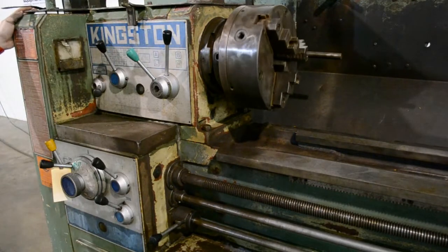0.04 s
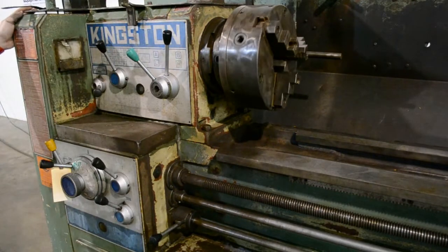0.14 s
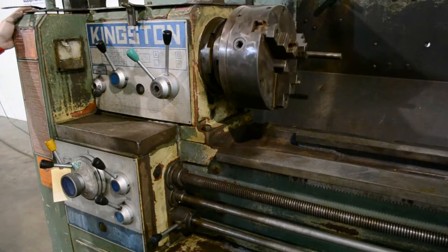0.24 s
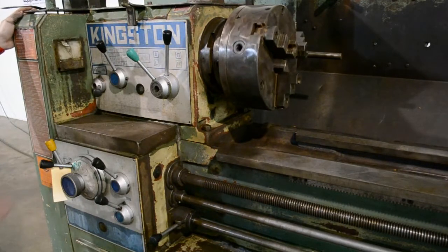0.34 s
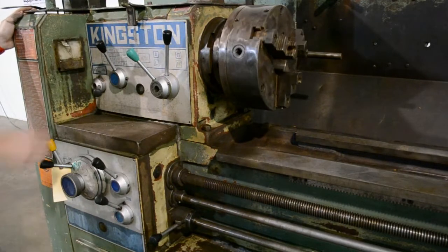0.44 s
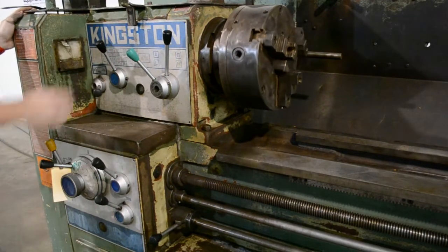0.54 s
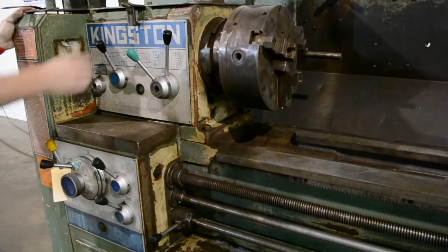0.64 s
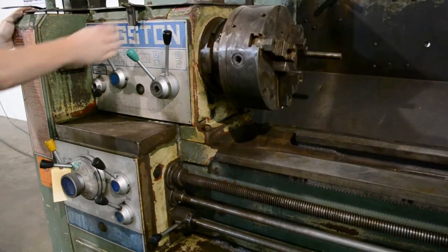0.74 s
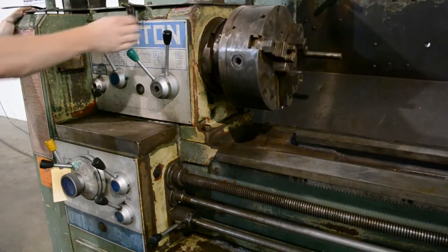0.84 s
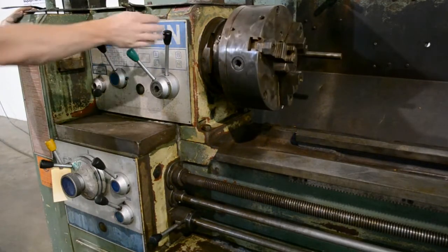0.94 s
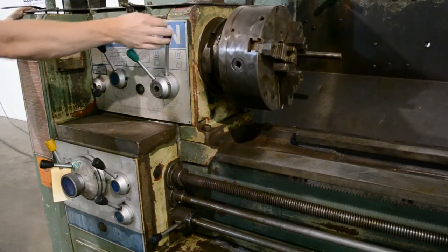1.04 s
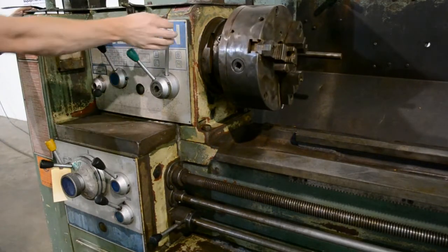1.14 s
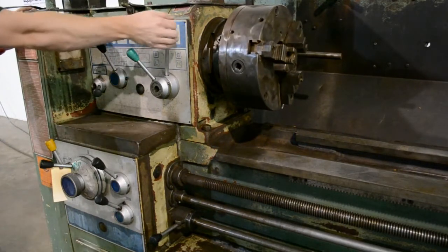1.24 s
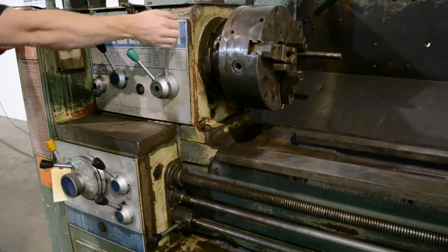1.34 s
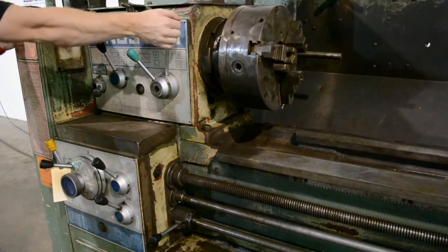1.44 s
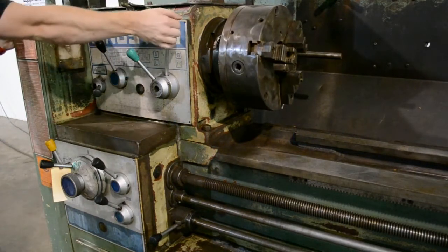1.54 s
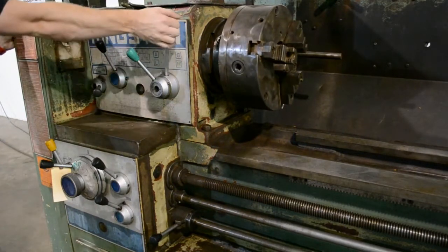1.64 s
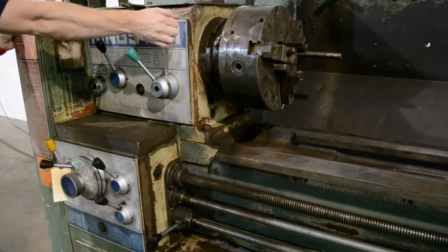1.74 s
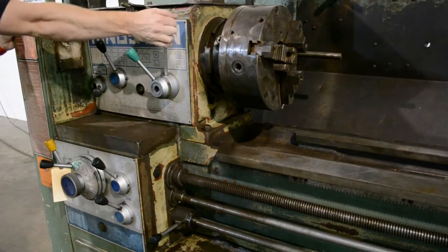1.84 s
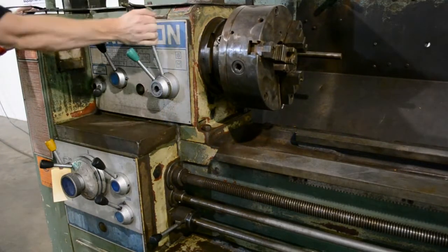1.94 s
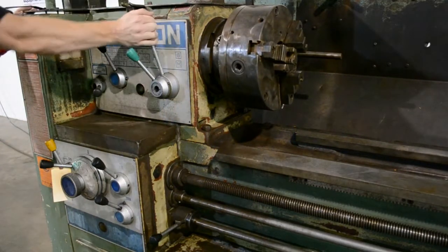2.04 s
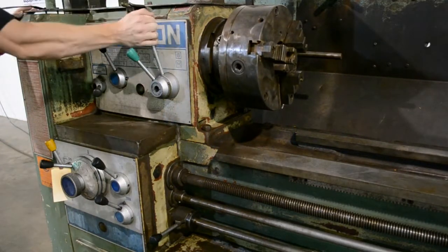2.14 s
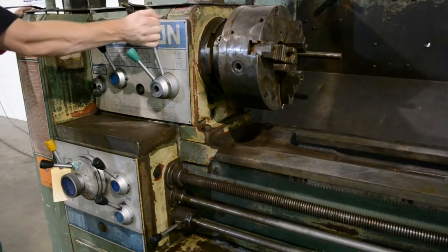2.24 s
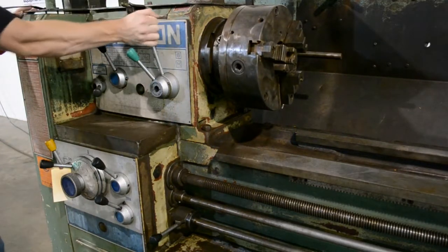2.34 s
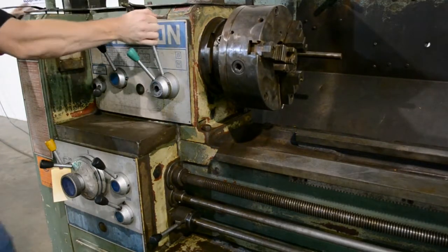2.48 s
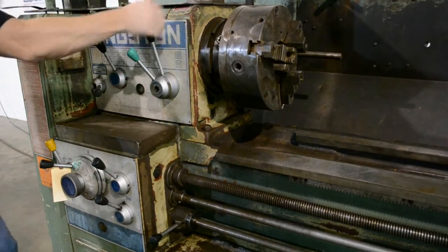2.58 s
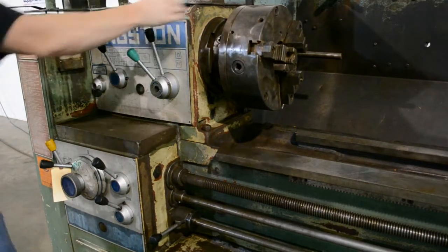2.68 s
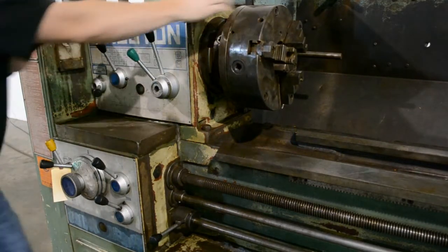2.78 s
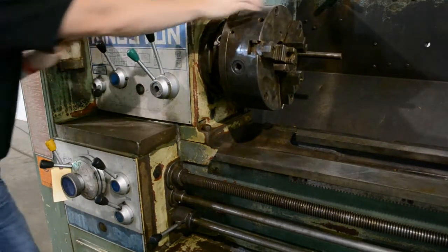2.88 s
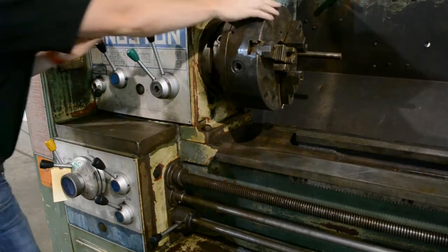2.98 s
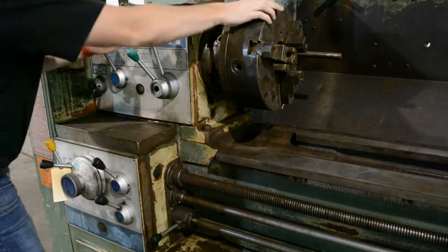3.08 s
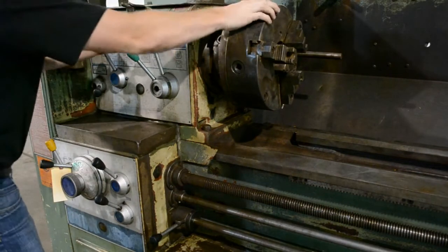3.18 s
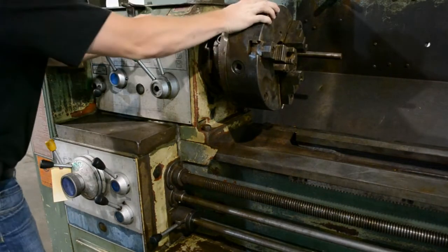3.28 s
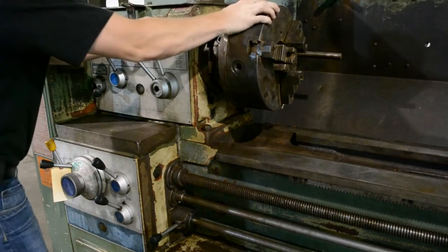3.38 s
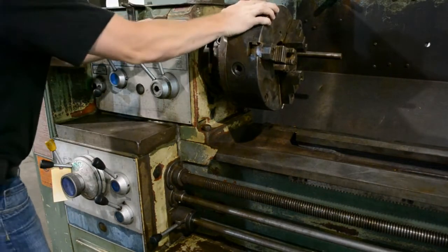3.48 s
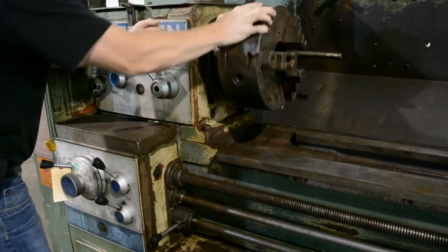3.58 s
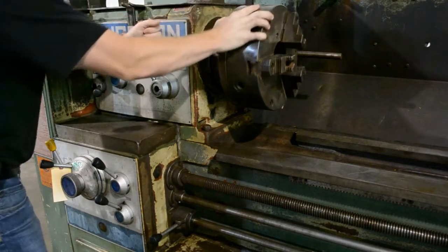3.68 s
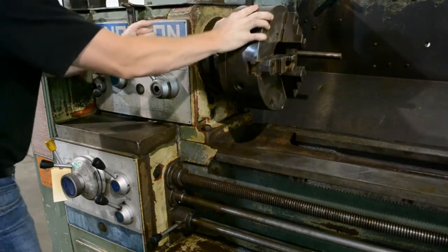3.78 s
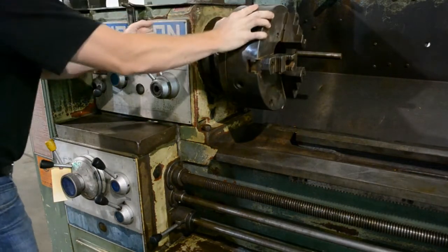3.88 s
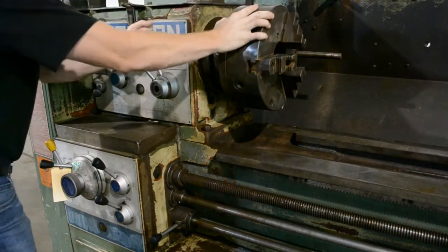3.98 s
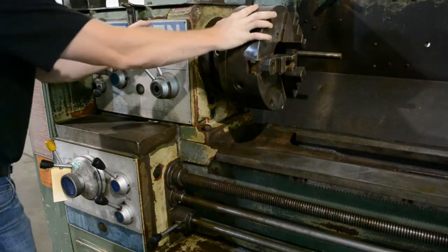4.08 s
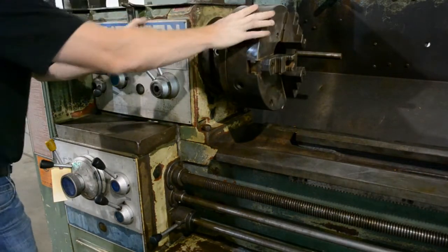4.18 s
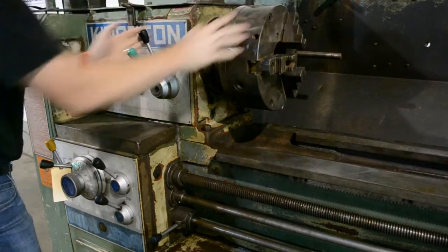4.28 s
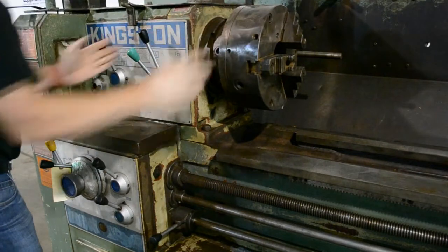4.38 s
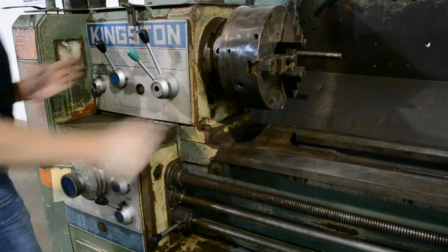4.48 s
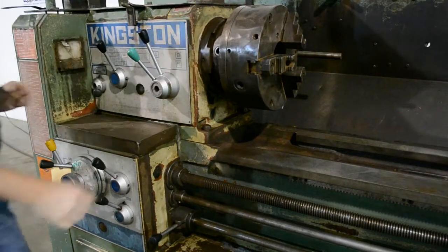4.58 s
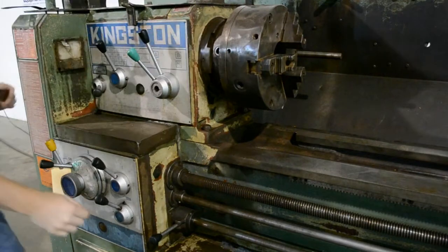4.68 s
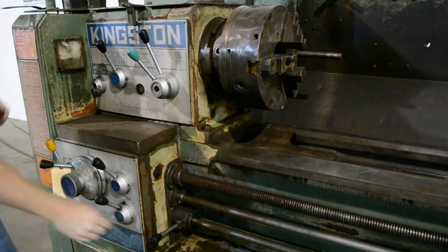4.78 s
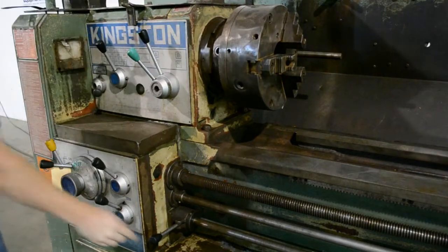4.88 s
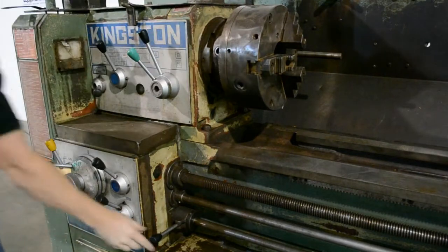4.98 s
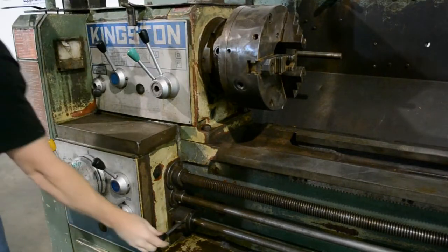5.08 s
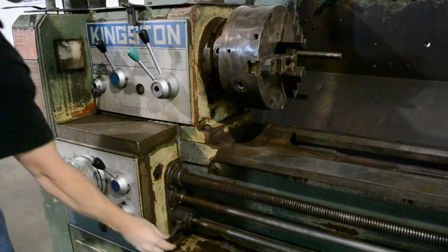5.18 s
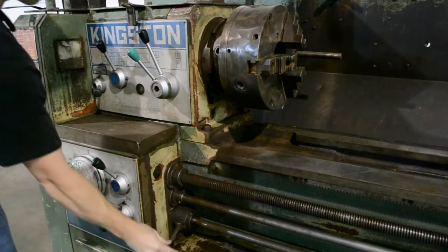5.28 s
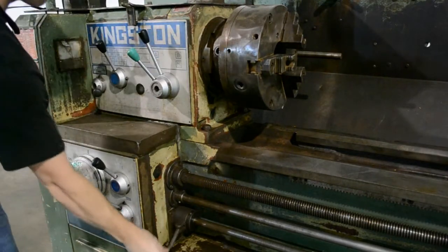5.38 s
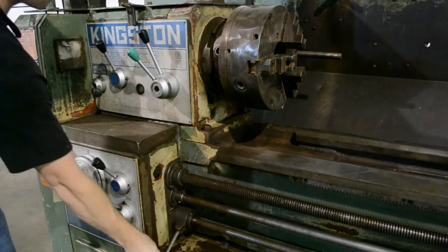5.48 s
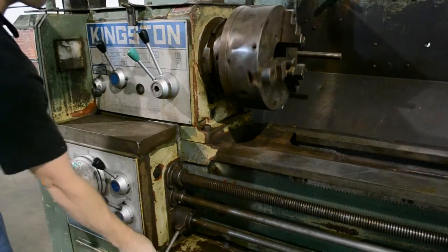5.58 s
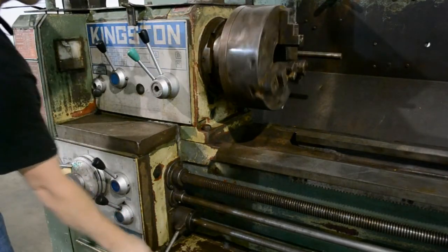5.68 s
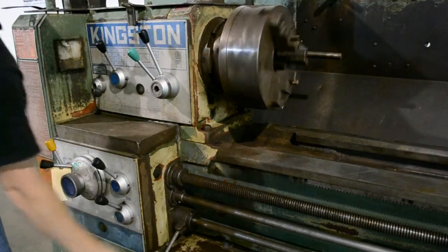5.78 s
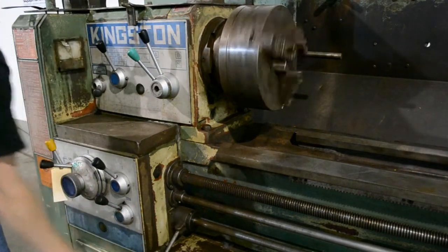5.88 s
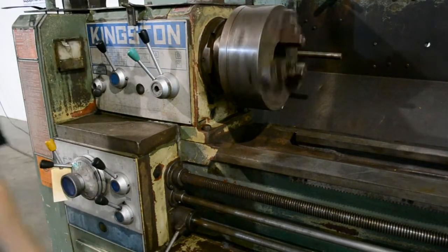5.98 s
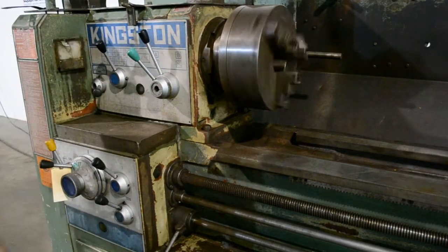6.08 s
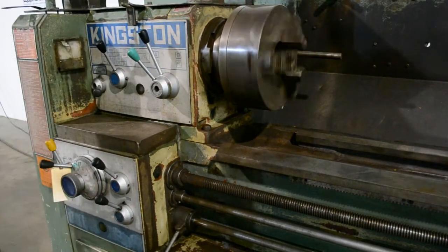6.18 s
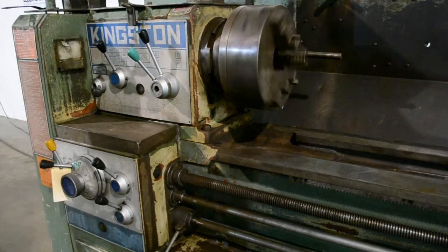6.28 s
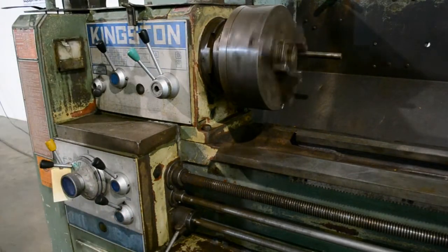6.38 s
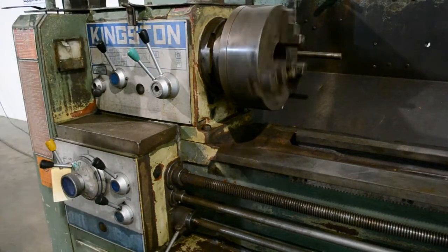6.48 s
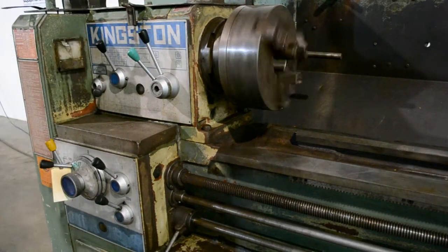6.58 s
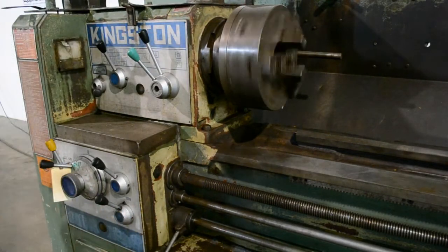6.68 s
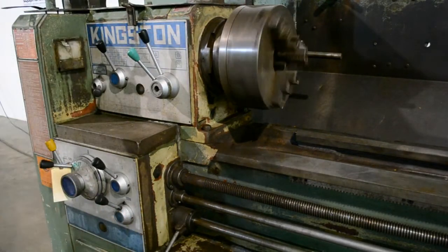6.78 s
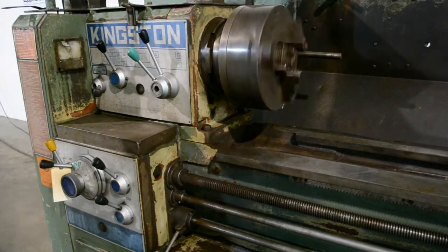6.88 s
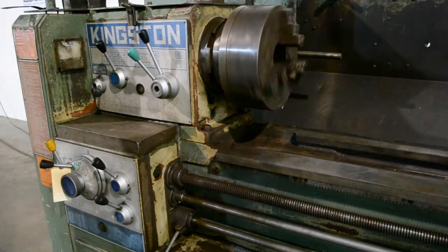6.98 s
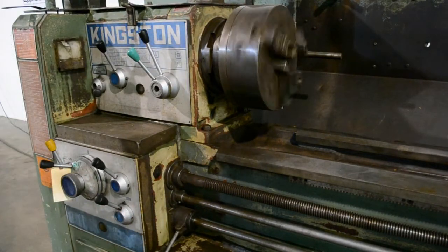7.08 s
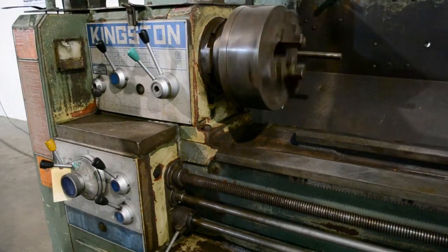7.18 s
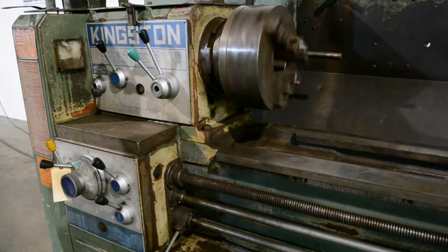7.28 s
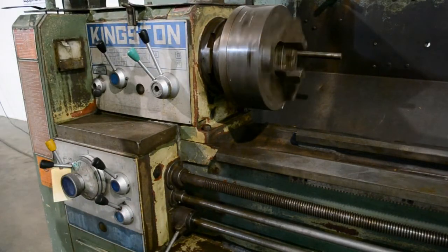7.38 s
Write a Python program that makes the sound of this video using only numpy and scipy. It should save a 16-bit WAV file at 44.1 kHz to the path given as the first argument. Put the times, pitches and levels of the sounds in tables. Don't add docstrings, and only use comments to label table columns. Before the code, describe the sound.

A lathe's gear train winds down to near quiet in a hall with soft air hum. The operator throws one sharp metal lever, handles parts with soft rubbing and tiny ticks, then shifts another with several duller clacks. A rattling snap starts the spindle, which surges quickly and runs on with roaring gears. Small nearby microphone, slightly dull treble, diffuse echo.

```python
import sys
import numpy as np
from scipy import signal
from scipy.io import wavfile

SR = 44100
rng = np.random.default_rng(int(sys.argv[2]) if len(sys.argv) > 2 else 0)


def how_loud(loudness_db):
    steps = np.asarray(loudness_db, float) / 20
    return 10 ** steps


def transcribe(signal):
    frames = np.atleast_2d(signal).T
    limited = np.clip(frames, -1, 1)
    pcm = np.round(limited * 32767).astype(np.int16)
    wavfile.write(sys.argv[1], SR, pcm)


N = 327663
BAND_EDGES_HZ = 18 * 2 ** (np.arange(29) / 3)


def spin():
    start_s, gain_hz_per_s, knee_hz, full_speed_hz = 5.42, 2480, 40, 1254
    since = np.arange(N) / SR - start_s
    gaining = -gain_hz_per_s * np.maximum(since, 0) / knee_hz
    slot_hz = -knee_hz * np.logaddexp(gaining, -full_speed_hz / knee_hz)
    return since, np.maximum(slot_hz, 0) / full_speed_hz, since - full_speed_hz / gain_hz_per_s


def motor():
    since, speed, _ = spin()
    turn = 2 * np.pi * np.cumsum(speed) / SR
    return np.sqrt(2) * (slot_tones(speed, turn) + mains_growl(since) + gear_meshes(speed, turn))


def slot_tones(speed, turn):
    # pitch at full speed in Hz, level in dB.
    slots = [(895, -9), (1254, 4), (2148, -10), (2840, -13)]
    # frequency in Hz, level in dB.
    answer = [(300, -10), (720, 3), (960, -7), (1190, 3), (1500, 0), (3000, 0)]
    _, _, after = spin()
    load = how_loud(settle(-37, -76, after + 0.022, release_s=0.037)) * speed ** 0.81
    out = np.zeros(N)
    for hz, db in slots:
        waver_db = np.clip(4 * drift(25), -12, 4)
        level = how_loud(db + at_hz(answer, 1 + hz * speed) + waver_db)
        out += load * level * np.sin(hz * turn + 2.2 * drift(30))
    return out


def mains_growl(since):
    growl_hz, attack_s, hold_s = 360, 0.063, 0.37
    swell_db = 3 * np.clip(1 - since / 0.2, 0, 1)
    current = how_loud(settle(-31.5, -62, since - hold_s, release_s=0.28) - swell_db)
    current *= np.clip(since / attack_s, 0, 1) ** 2
    growl = how_loud(0.5 * drift(7.5)) * np.sin(2 * np.pi * growl_hz * np.arange(N) / SR + 0.49 * drift(38))
    shaking = how_loud(-11) * rms_one(cut(rng.standard_normal(N), [220, 480], "band"))
    return current * (growl + shaking)


def gear_meshes(speed, turn):
    # pitch at full speed in Hz, level in dB rms.
    whine = [(166.9, -63), (780.6, -52), (893.6, -42), (1077, -53), (1254, -51), (1480, -50), (1712, -56),
             (1933, -58), (2116, -62), (2148, -61), (2320, -60), (2686, -63), (2724, -59), (2842, -59)]
    # (ratio, level in dB rms).
    gear_pairs = [(376.8, [(1, -52), (2, -52), (3, -52)]), (597.5, [(1, -50), (2, -49), (4, -57)]),
                  (225.5, [(6, -54), (7, -50), (8, -57), (10, -63), (11, -62)])]
    tones = whine + [(hz * k, db) for hz, multiples in gear_pairs for k, db in multiples]
    out = np.zeros(N)
    for hz, db in tones:
        level = filled(how_loud(db + 1.3 * slow(8)))
        waver = filled(0.6 * slow(3) + 0.35 * slow(15)) / 1000
        out += level * np.sin(hz * (turn + waver))
    return how_loud(0.5) * out * speed ** 2.5


def headstock():
    # resonance in Hz, width in Hz, level in dB.
    housing = [(330, 60, -10), (377, 30, -14), (598, 40, -9), (735, 80, -3), (894, 40, -8),
               (1200, 130, -10), (1365, 50, -7), (1495, 26, 6), (1530, 30, 5), (1625, 45, 1), (1688, 20, 0),
               (1830, 80, -10), (2370, 90, -11), (2720, 50, -13), (2880, 80, -14)]
    # resonance in Hz, width in Hz, level in dB.
    slack_train = [(377, 18, 1), (600, 40, -6), (790, 20, -3), (1320, 90, -9), (1505, 25, -1),
                   (1625, 30, 0), (2500, 700, -13)]
    # frequency in Hz, level in dB per Hz.
    roar_spectrum = [(35, -65), (60, -79), (239, -16), (371, -3.5), (516, -10.5), (588, -3), (818, -6),
                     (893, 1), (975, -6), (1510, -8), (2010, -10.5), (2800, -14), (7850, -35), (9360, -30),
                     (11400, -46), (14800, -88), (22000, -120)]
    tooth_hz, coast_s, attack_s, surge_s = 298.4, 1.37, 0.044, 0.084
    since, _, after = spin()
    t = np.arange(N) / SR
    roar = how_loud(-4.5) * hiss(roar_spectrum, patchy_db=0.4)
    coasting = how_loud(-3) * rattle(slack_train, 400, spread_db=0) + roar
    in_step = 1 + 0.11 * np.sin(2 * np.pi * tooth_hz * t)
    driven = how_loud(-6) * rattle(housing, 1200, spread_db=2) + roar
    driven = cut(driven * in_step, 120, "high")
    coast_db = -49.5 - 26 * (t / coast_s) ** 2.12
    loaded_db = -2.5 * np.clip(-after / surge_s, 0, 1)
    surge_db = 3 * np.exp(-((after + 0.023) / surge_s) ** 2)
    driven_level = how_loud(-33.5 + loaded_db + surge_db) * np.clip(since / attack_s, 0, 1) ** 2
    return how_loud(coast_db) * coasting + driven_level * driven


def rattle(casting, per_s, spread_db):
    out, count = 0, int(per_s * N / SR)
    for hz, width_hz, level_db in casting:
        knocks = np.zeros(N)
        force_db = spread_db * np.minimum(rng.exponential(1, count), 4)
        knocks[rng.integers(0, N, count)] = how_loud(force_db) * rng.choice([-1, 1], count)
        knocks *= filled(how_loud(2.5 * slow(14)))
        out = out + how_loud(level_db) * np.sqrt(width_hz) * rms_one(ring(knocks, hz, 2.6 / width_hz))
    return rms_one(out)


def levers():
    # start in seconds, clank peak in dB, softness 0-1, cover ring in dB and crack in dB re clank.
    blows = [(1.9249, -25.5, 0, -7, 11), (1.928, -9.5, 0.083, -10, -1), (1.932, -24, 0.76, -5, -6),
             (1.945, -30, 0.96, -17, -25), (1.963, -25, 1, -7, -16), (3.557, -35, 0.33, 0, -14),
             (3.634, -38.5, .45, 1, -12), (3.64, -28, 0.71, -6, -2), (3.71, -18, 0.25, -29, -3.5),
             (3.725, -22.5, 0.23, -8.5, -18), (3.787, -17, 0.48, -14.5, -13.5),
             (3.791, -20, 0.5, -8.5, -18), (3.808, -28, .98, 4, -30), (5.4251, -29, .1, -6, -6),
             (5.428, -17.5, 0.28, -7, -8), (5.434, -16.5, 0.58, -7, -11), (5.448, -16.5, .0, -25, 2),
             (5.4791, -15, 0.13, -17, -15), (5.489, -20, .3, -15, -4)]
    # frequency in Hz, level in dB.
    bed_modes = [(170, -12), (245, -8), (320, -12)]
    # frequency in Hz, level in dB.
    cover_modes = [(395, -9), (474, -16), (522, -5), (598, 3), (670, -12), (790, -12)]
    # frequency in Hz, level in dB.
    lever_modes = [(985, 4.5), (1110, 10), (1250, 12), (1340, -1), (1480, 13), (1680, 4), (1920, 5.5),
                   (2200, 4)]
    # frequency in Hz, level in dB.
    pin_modes = [(2480, 1), (2950, -3), (3400, -5), (3900, -4), (4400, -8)]
    hard_db, soft_db = (-32, -15.5), (-3.5, -45)
    near, spread, t = np.zeros(N), np.zeros(N), np.arange(SR // 4) / SR
    click = 1.0 * (t == 0)
    bands_hz = [120, 320], [350, 994], [800, 1670], [2250, 4120]
    thud, body, clank, crack = (peak_one(cut(click, hz, "band", order=3)) for hz in bands_hz)
    top = peak_one(cut(click, 6000, "high", order=3))
    for s, peak_db, soft, body_db, crack_db in blows:
        thud_db, top_db = np.add(hard_db, np.clip(soft, 0, 1) * np.subtract(soft_db, hard_db))
        contact = how_loud(13) * click + rng.standard_normal(len(t)) * np.exp(-t / 0.0045)
        chatter = how_loud(8) * click + rng.standard_normal(len(t)) * np.exp(-t / 0.006)
        blow = struck(cut(contact, [800, 2600], "band"), lever_modes, t60=0.022)
        blow += how_loud(thud_db - 13.5) * struck(cut(contact, [140, 350], "band"), bed_modes, t60=0.14)
        blow += how_loud(body_db - 0.5) * struck(cut(contact, [330, 800], "band"), cover_modes, t60=0.13)
        edge = peak_one(cut(chatter, [2300, 4600], "band", order=3))
        edge += how_loud(-1.5) * struck(cut(chatter, 2000, "high"), pin_modes, t60=0.022)
        blow += how_loud(crack_db - 11.5) * edge
        blow += how_loud(top_db + 1.6) * peak_one(cut(chatter, 6000, "high", order=4))
        even = clank + how_loud(thud_db + 0.5) * thud + how_loud(body_db + 3) * body
        even += how_loud(crack_db - 10.5) * crack + how_loud(top_db + 8) * top
        near[round(s * SR):][:len(t)] += how_loud(peak_db + 3) * blow
        spread[round(s * SR):][:len(t)] += how_loud(peak_db) * even
    return near, spread


def struck(contact, modes, t60):
    chance = rng.normal(0, 1, (len(modes), 2))
    rung = 0
    for (hz, db), (more, off) in zip(modes, chance):
        rung = rung + how_loud(db + 2 * more) * ring(contact, hz * (1 + 0.012 * off), t60)
    return peak_one(rung)


def small_touches():
    # start in seconds, peak in dB, pitch in Hz.
    knocks = [(0.197, -34, 1290), (0.288, -32, 1310), (0.522, -35.5, 1340), (0.759, -38.5, 1340),
              (1.303, -39, 1190), (1.311, -41.5, 590), (1.583, -37.5, 1430), (2.661, -55, 2290),
              (3.965, -26, 1160), (4.782, -39, 298), (5.095, -30.5, 1850), (5.559, -13.5, 383)]
    # start in seconds, peak in dB.
    bright = [(1.2233, -53), (1.626, -54), (1.714, -55), (1.7854, -58), (1.816, -46), (2.2134, -47),
              (2.6628, -40), (2.7816, -51), (3.4133, -52), (3.4844, -67), (3.727, -35), (3.762, -46),
              (4.6144, -64), (4.6413, -52), (4.785, -39), (5.097, -39), (5.121, -55), (5.2095, -56),
              (5.2759, -46)]
    # start in seconds, peak in dB, pitch in Hz, T60 in seconds.
    rod = [
        (4.965, -51, 1770, 0.16),
        (5.098, -58, 1750, 0.13),
    ]
    out = puffs([(*row, 0.04) for row in knocks], width=1.2, rise_s=0.008, level_db=-1.5)
    out += puffs([(*row, 4600, 0.009) for row in bright], width=2.1, rise_s=0.0012, level_db=3)
    return out + puffs(rod, width=1.02, rise_s=0.003, level_db=-2.5)


def puffs(events, width, rise_s, level_db):
    out, t = np.zeros(N), np.arange(SR // 5) / SR
    for s, peak_db, hz, t60 in events:
        band_hz = [hz / width, min(hz * width, 0.4 * SR)]
        puff = rms_one(cut(rng.standard_normal(len(t)), band_hz, "band", order=3))
        decay = how_loud(peak_db + level_db - 60 * t / max(t60, 0.003))
        out[round(s * SR):][:len(t)] += decay * puff * np.minimum(t / rise_s, 1)
    return out


def scuffs():
    # loudest at seconds, swell and fade in seconds per 20 dB, level in dB, top above 6 kHz in dB.
    rubs = [(1.875, 0.067, 0.29, -56, 0.5), (1.914, 0.034, 0.0062, -50.5, 9.5),
            (2.51, 0.52, .2, -59.5, -13.5), (2.664, 0.0064, 0.045, -52, -4.5),
            (2.92, 0.41, 0.32, -70, -4.5), (3.709, 0.0093, 0.028, -40.5, -4),
            (3.765, 0.048, 0.039, -51.5, 4), (4.16, 0.51, 0.32, -57.5, -5), (4.67, 0.42, 0.054, -65.5, -9),
            (4.79, 0.013, 0.067, -60.5, 4), (4.824, 0.017, 0.079, -48, -9), (4.93, 0.12, 1, -66.5, -15),
            (5.433, 0.01, 0.022, -42, 11.5), (5.45, 0.026, 0.0075, -46, 0)]
    # frequency in Hz, level in dB per Hz.
    friction = [(400, -24), (1200, -6), (2500, 0), (5500, -4), (11400, -4)]
    t = np.arange(N) / SR
    strokes = []
    for s, swell_s, fade_s, db, _ in rubs:
        away = np.clip(np.maximum((s - t) / swell_s, (t - s) / fade_s), 0, 5)
        strokes.append(how_loud(db - 20 * away))
    strokes = np.array(strokes)
    grain = hiss(friction, patchy_db=1.2) * how_loud(1.5 * drift(150))
    low = strokes.sum(axis=0) * how_loud(1) * rms_one(cut(grain, 4770, "low", order=4))
    top = how_loud(np.array(rubs)[:, 4]) @ strokes
    return low + top * rms_one(cut(grain, 5780, "high", order=4))


def shop(x):
    # frequency in Hz, T60 in seconds.
    hall_t60 = [(120, 2.02), (300, 1.23), (700, 0.85), (1500, 1.15), (3000, 1.55), (6000, 1.45),
                (10000, 0.54)]
    # frequency in Hz, level in dB.
    hall_colour = [(120, -5), (300, 3), (700, 9.5), (1500, -6), (2700, 7.5), (4000, 5), (6500, 5),
                   (10000, 5)]
    t = np.arange(N // 5) / SR
    panels = 1 + how_loud(12.5) * np.exp(-t / 0.017)
    tail = banded(rng.standard_normal((2, len(t))),
                  lambda hz: how_loud(at_hz(hall_colour, hz) - 60 * t / at_hz(hall_t60, hz)))
    tail *= panels * np.clip((t - 0.004) / 0.012, 0, 1)
    return signal.fftconvolve(x, tail / np.sqrt(np.sum(tail ** 2)))[:N]


def shop_air():
    # frequency in Hz, level in dB per Hz.
    air = [(12, -67), (20, -46), (64, -2.5), (172, -7.5), (230, -2.5), (277, -10), (316, -9.5), (391, -6.5),
           (702, -7.5), (1400, -8.5), (1730, -11), (2580, -13.5), (4380, -23), (9720, -36), (11400, -22),
           (14800, -70), (22000, -120)]
    return how_loud(-59) * hiss(air, patchy_db=-0.36)


def hiss(spectrum, patchy_db):
    together = slow(12)

    def gain(hz):
        flicker = 0.64 * together + slow(7.9)
        return filled(how_loud(at_hz(spectrum, hz) + patchy_db * flicker))
    return rms_one(banded(rng.standard_normal((2, N)), gain))


def banded(white, gain):
    out = 0
    for k, (low, high) in enumerate(zip(BAND_EDGES_HZ, BAND_EDGES_HZ[1:])):
        out = out + gain(np.sqrt(low * high)) * cut(white[k % len(white)], [low, high], "band")
    return out


def at_hz(points, hz):
    table_hz, value = np.transpose(points)
    return np.interp(np.log(hz), np.log(table_hz), value)


def ring(clicks, hz, t60):
    r, w = how_loud(-60 / (t60 * SR)), 2 * np.pi * hz / SR
    return signal.lfilter([0, np.sin(w)], [1, -2 * r * np.cos(w), r * r], clicks + 1e-18)


def cut(x, hz, kind, order=2):
    return signal.sosfilt(signal.butter(order, hz, kind, fs=SR, output="sos"), x)


def settle(from_db, to_db, after, release_s):
    return to_db + (from_db - to_db) * np.exp(-np.maximum(after, 0) / release_s)


def slow(rate_hz):
    r = np.exp(-80 * np.pi * rate_hz / SR)
    white = rng.standard_normal(N // 40 + 2002)
    return rms_one(signal.lfilter([1], [1, -2 * r, r * r], white)[2000:])


def filled(coarse):
    return np.interp(np.arange(N) / 40, np.arange(len(coarse)), coarse)


def drift(rate_hz):
    return filled(slow(rate_hz))


def rms_one(x):
    return x / np.sqrt(np.mean(x ** 2) + 1e-20)


def peak_one(x):
    return x / np.abs(x).max()


def scene():
    near, spread = levers()
    touches = small_touches()
    steady = motor() + headstock() + scuffs()
    diffuse = shop(how_loud(5) * spread + how_loud(-10) * touches)
    return (near + touches + steady + diffuse + shop_air())[None]


def roll_off(x):
    return signal.sosfilt(signal.butter(12, 11570, fs=SR, output="sos"), x)


def record(dry):
    dipped = dry - 0.62 * signal.lfilter(*signal.iirpeak(7900, 9, fs=SR), dry)
    return roll_off(cut(dipped, 9970, "low", order=10))


dry = scene()
out = record(dry)
transcribe(out)
```